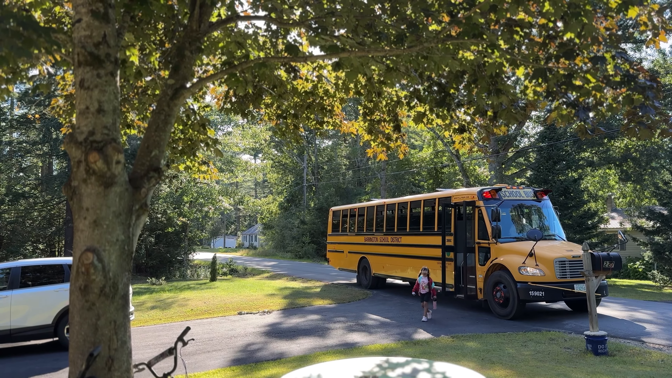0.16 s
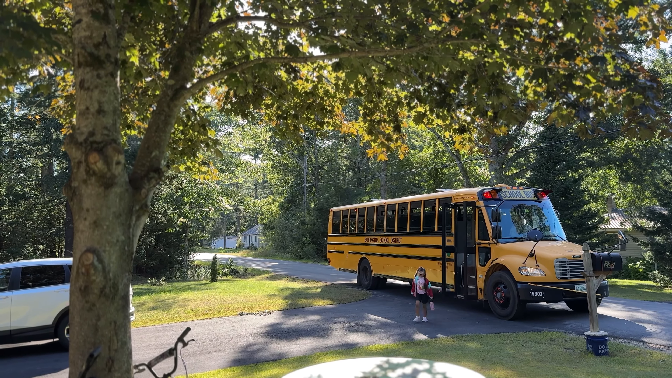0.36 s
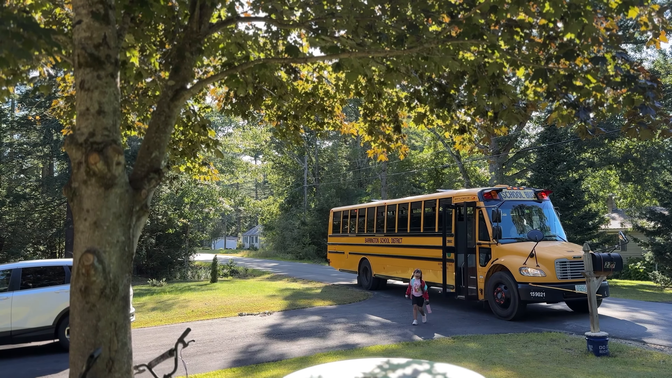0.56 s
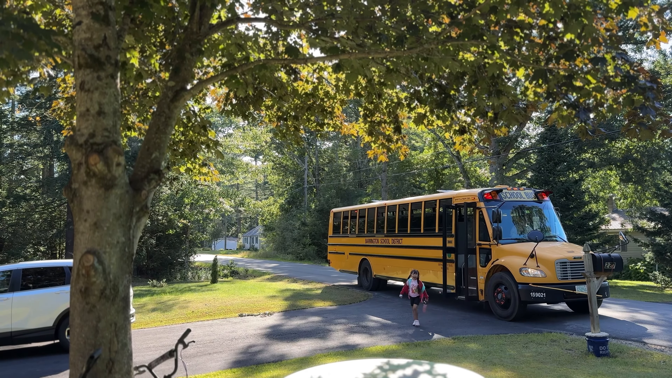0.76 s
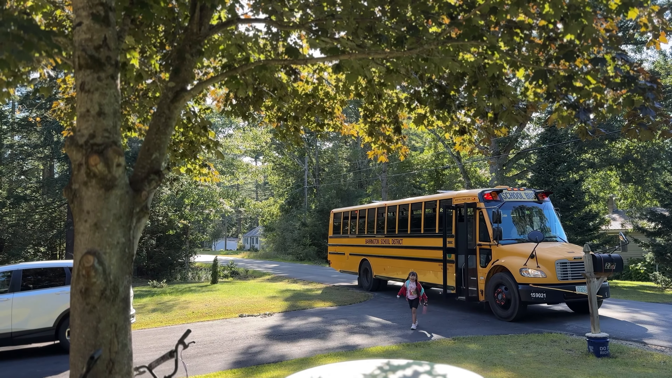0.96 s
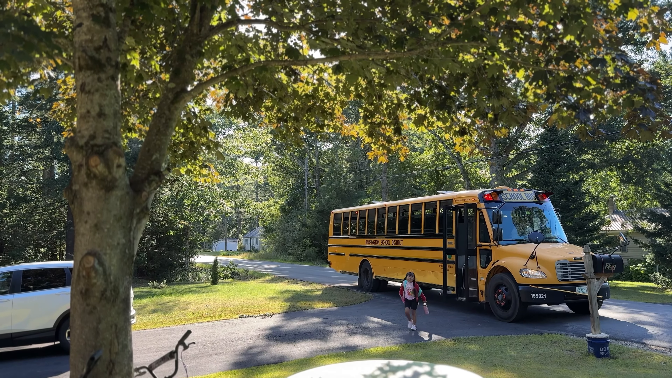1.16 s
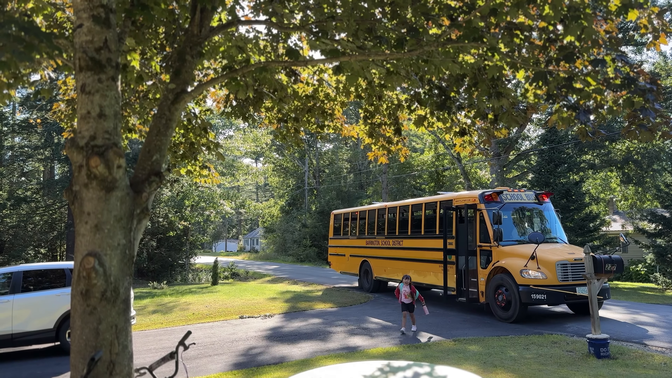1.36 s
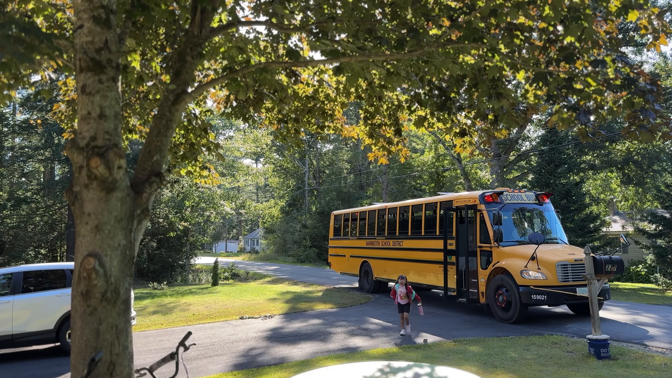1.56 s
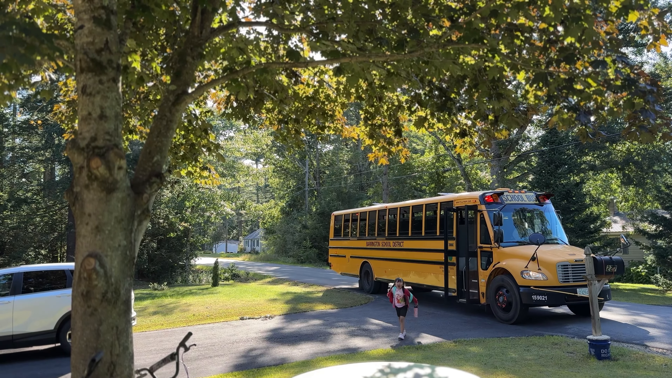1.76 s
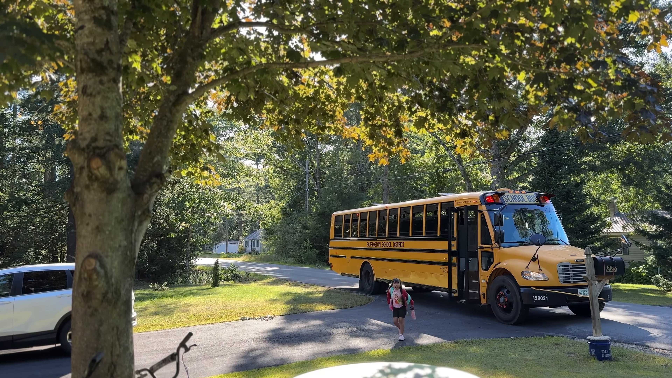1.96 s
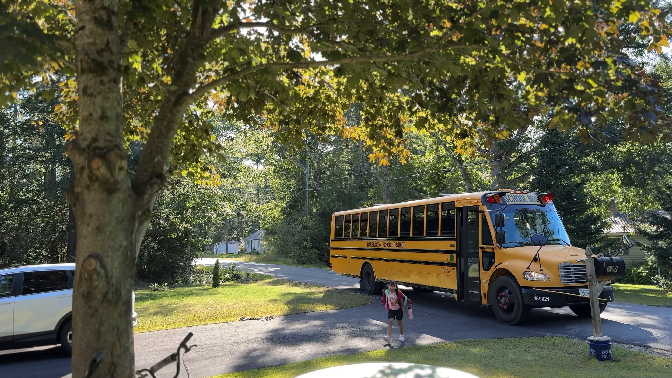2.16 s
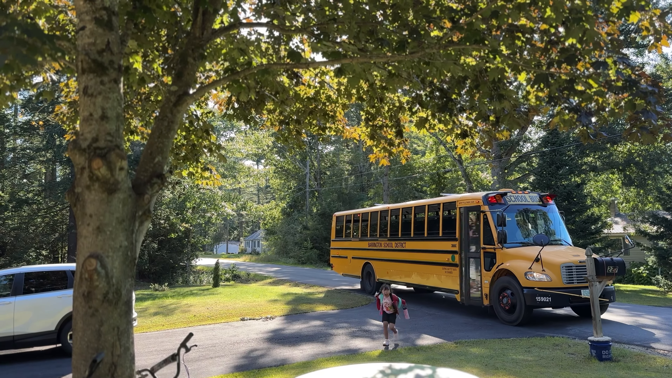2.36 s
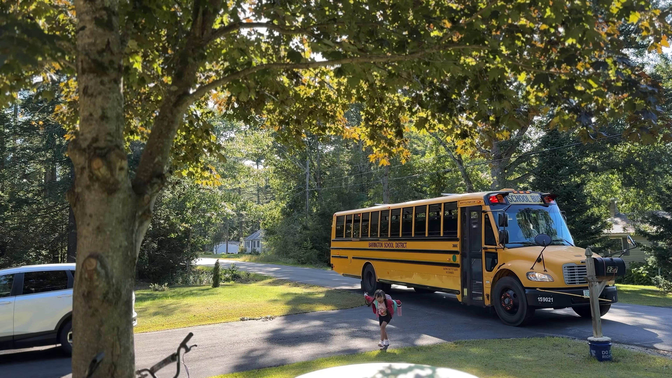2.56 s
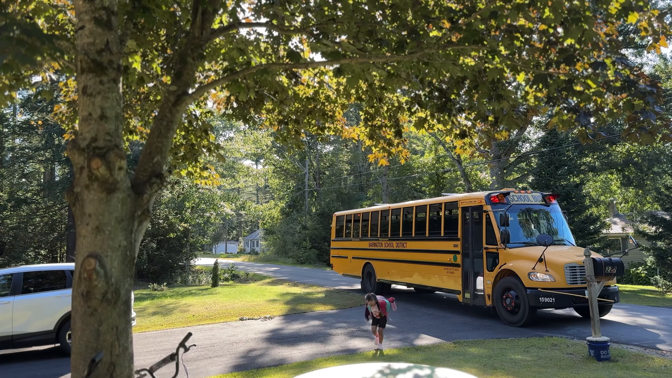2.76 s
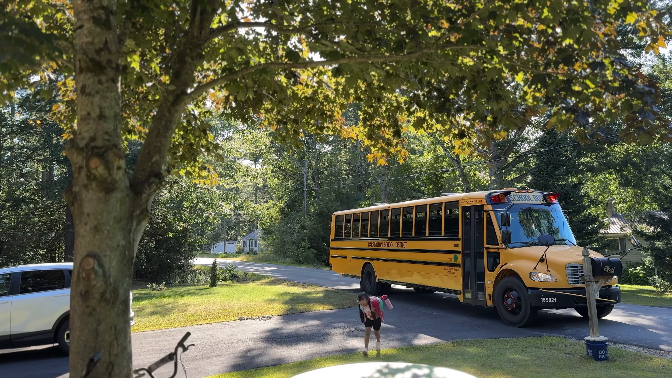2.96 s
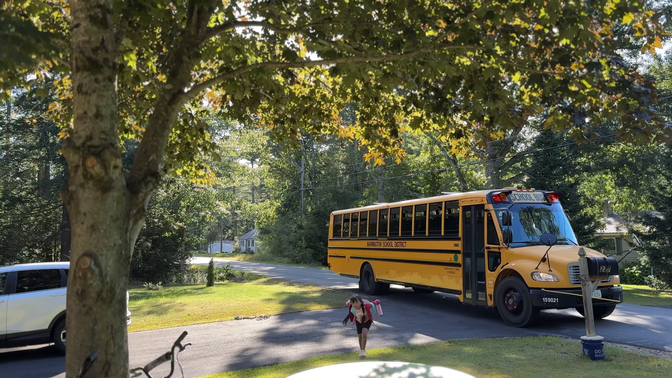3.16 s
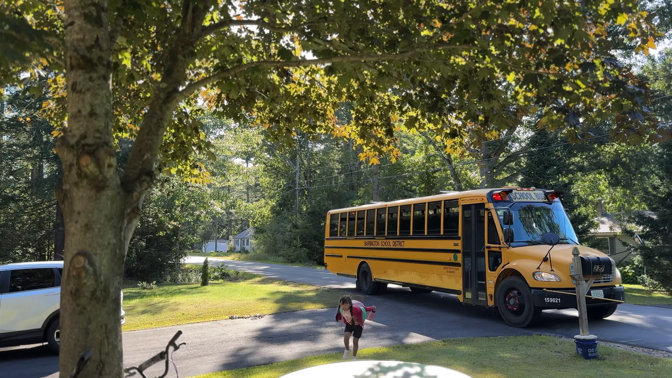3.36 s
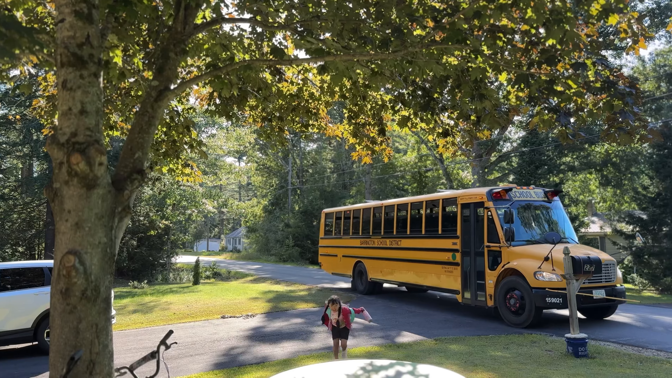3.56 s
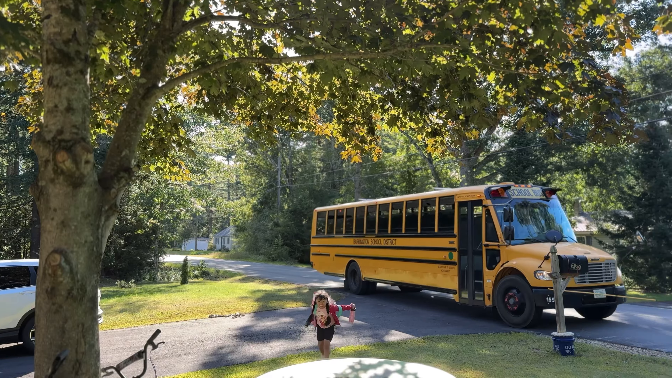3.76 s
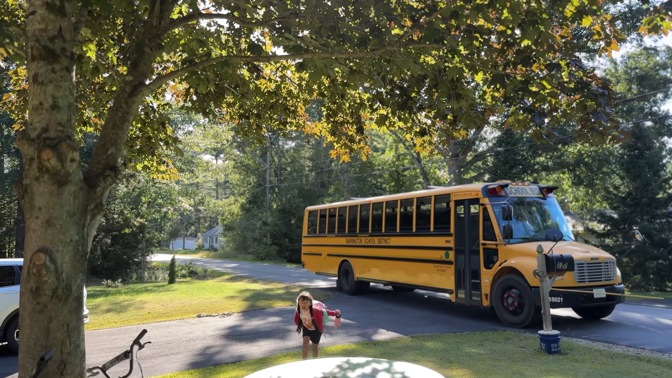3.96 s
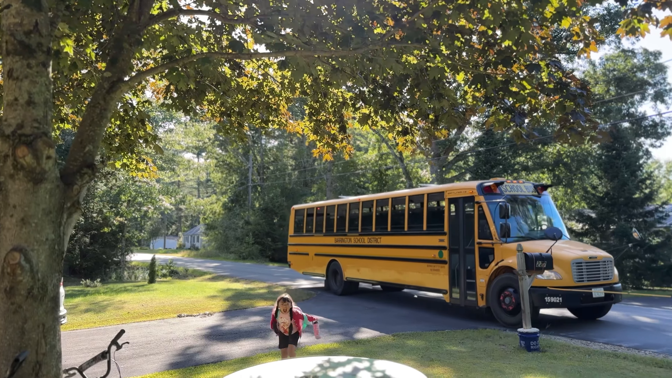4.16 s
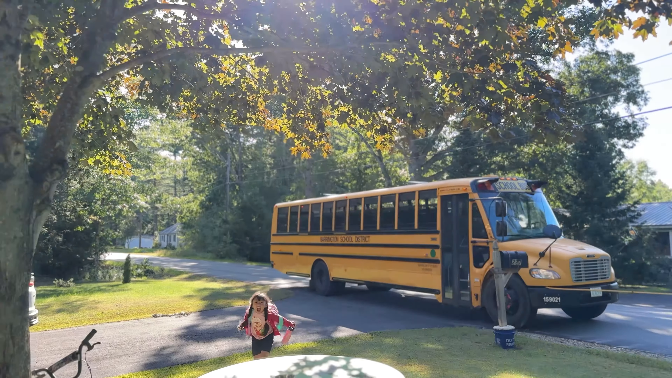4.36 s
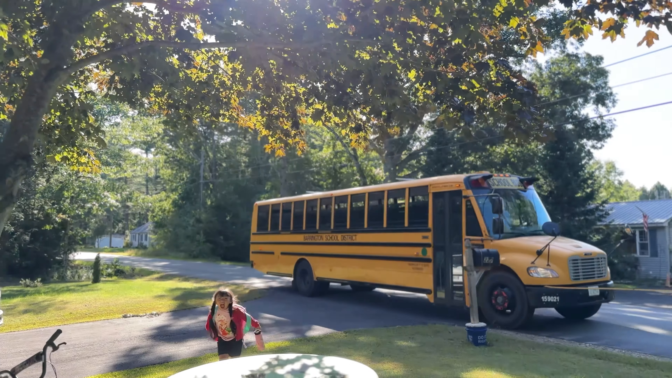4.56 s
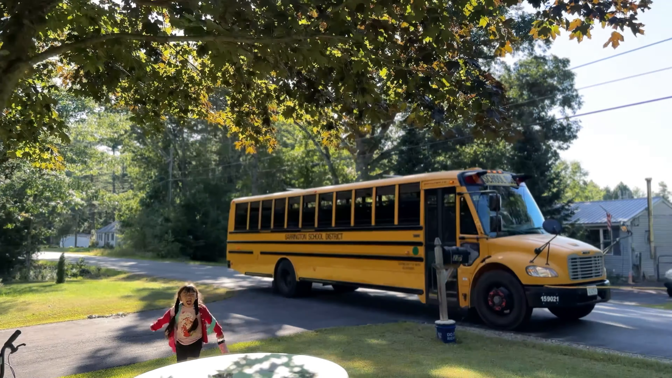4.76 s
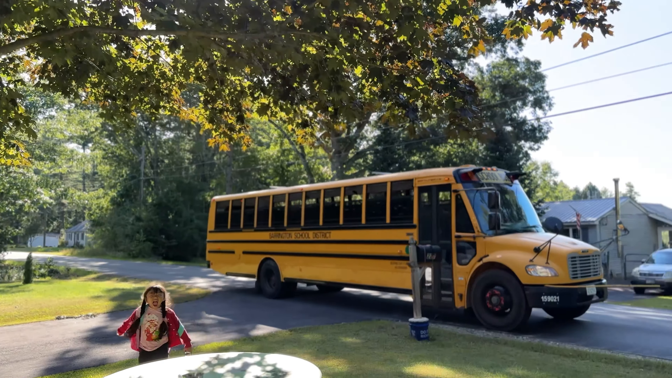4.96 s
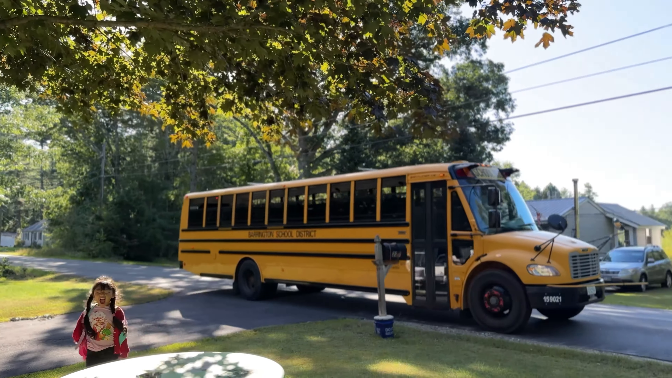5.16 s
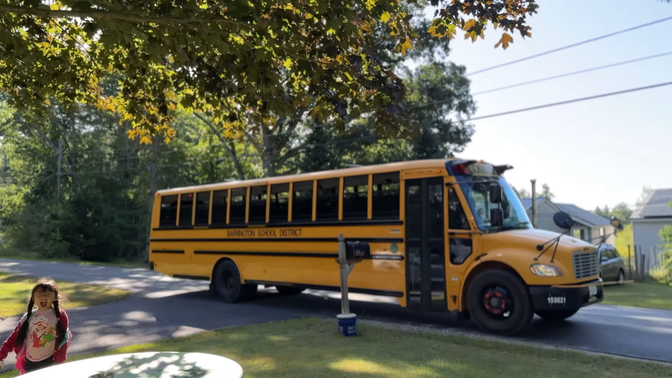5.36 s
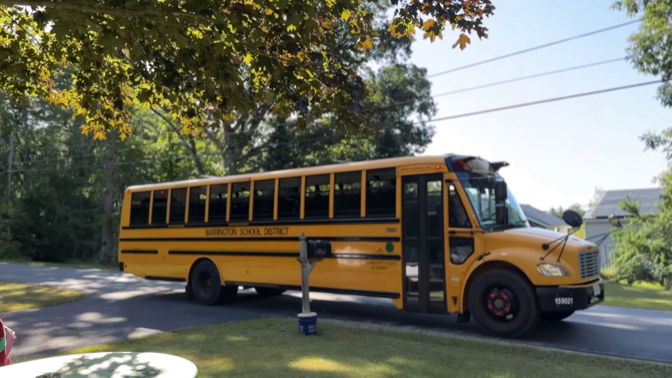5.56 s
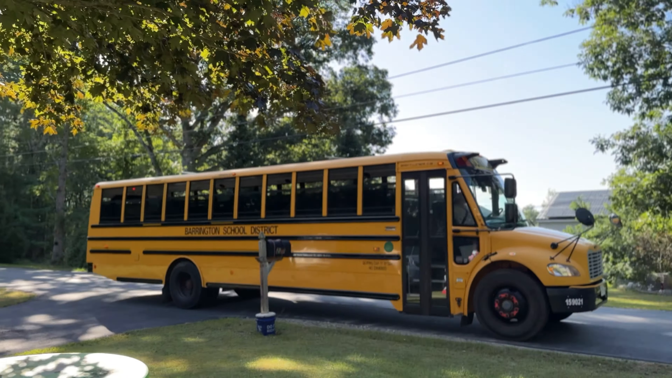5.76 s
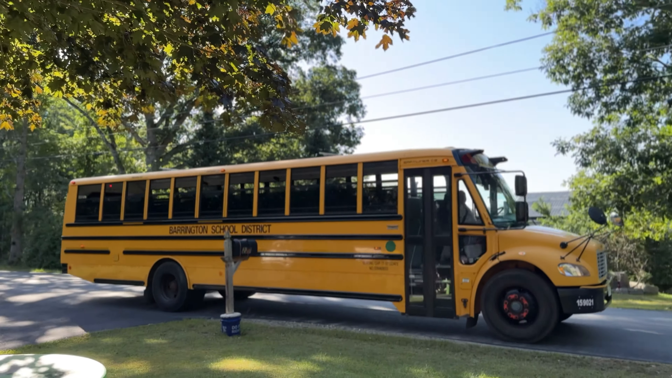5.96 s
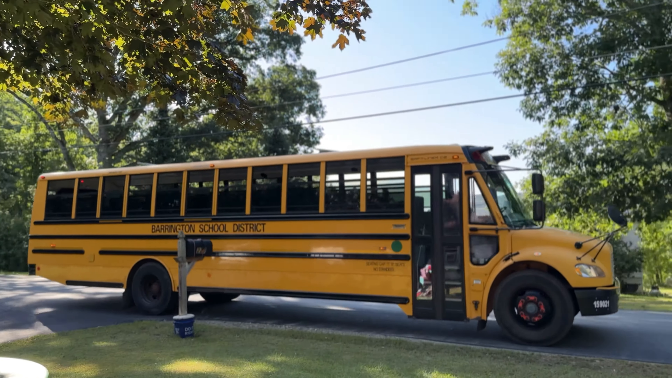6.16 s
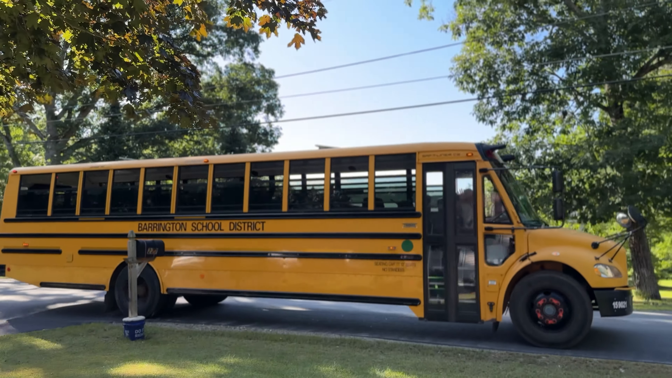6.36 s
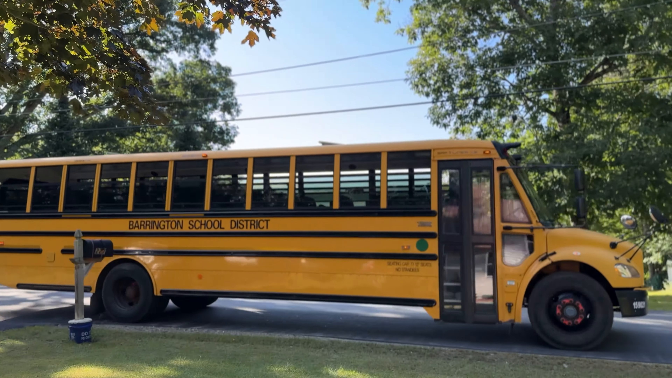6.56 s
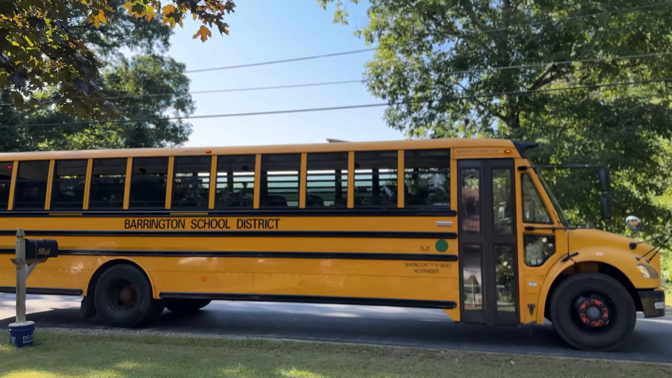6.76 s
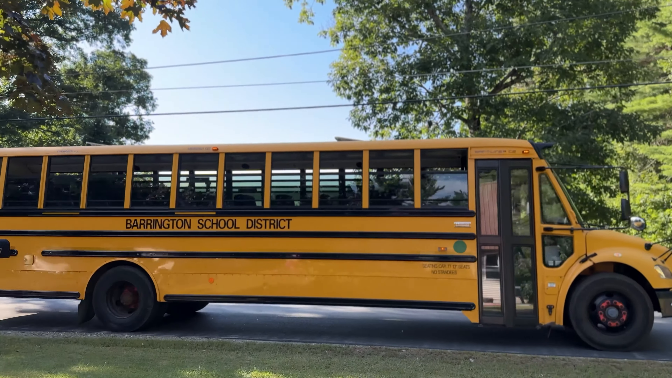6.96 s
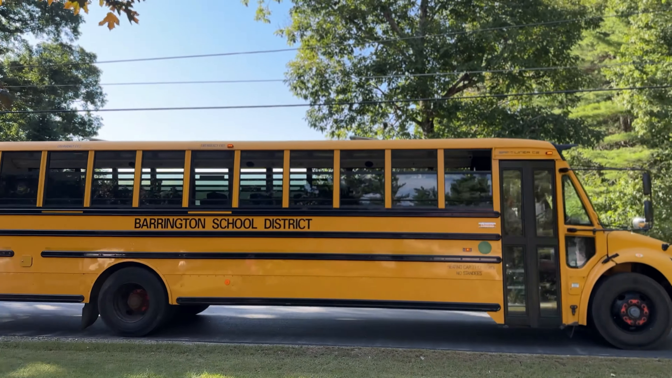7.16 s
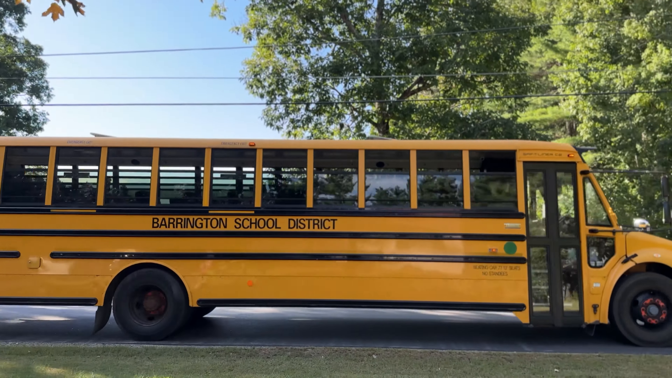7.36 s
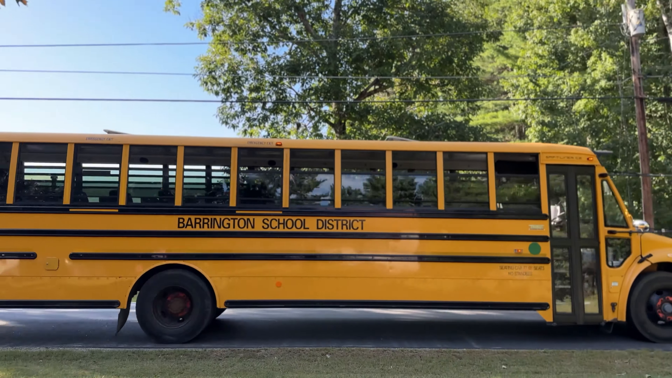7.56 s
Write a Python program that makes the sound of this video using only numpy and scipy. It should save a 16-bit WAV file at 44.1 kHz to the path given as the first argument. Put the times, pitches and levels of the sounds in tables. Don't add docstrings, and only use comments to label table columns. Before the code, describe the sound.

Outdoor stereo phone pickup from the far pavement of a leafy street. From 0 to 2.5 s a six-cylinder diesel bus idles at a low, steady throb, with soft injection and valve clatter and faint fan hiss. Tiny ticks fall near 0.1 and 1.8 s; a songbird at the left whistles short arched notes around 0.8-1.3 and 2.2-2.7 s. From 2.6 s the revs climb steeply, almost doubling in pitch by 3.3 s, with a small dull double knock at 3.1 s. The exhaust turns rough and growling, clearly louder, and gear whine sings around 3.5-4.5 s. Pitch rises slowly to a peak near 5.6 s, drops a little by 6 s, then holds and edges up. Level is strongest around 6 s. Thin, rasping, high spring squeaks come at 4.2, 5.4, 6.2, 7.0 and 7.4 s. The passing bus stays loud, clattering and hissing until the end at about 7.6 s.

```python
import sys
import numpy as np
from scipy import signal
from scipy.fft import rfft, irfft
from scipy.io import wavfile
from scipy.ndimage import uniform_filter1d

SR = 44100
rng = np.random.default_rng(int(sys.argv[2]) if len(sys.argv) > 2 else 0)


def boost(x):
    u = np.asarray(x, float) / 20
    return 10 ** u


def file_out(sig):
    cols = np.atleast_2d(sig).T
    lim = np.clip(cols, -1, 1)
    pcm = np.round(lim * 32767).astype(np.int16)
    wavfile.write(sys.argv[1], SR, pcm)


N = 335160
TIME = np.arange(N) / SR


def in_time(rows):
    s, *columns = np.transpose(rows)
    return [np.interp(TIME, s, column) for column in columns]


def rms_one(x):
    return x / np.sqrt(np.mean(x ** 2) + 1e-20)


def drift(rate):
    pole = np.exp(-80 * np.pi * rate / SR)
    noise = rng.standard_normal(N // 40 + 2002)
    slow = signal.lfilter([1], [1, -2 * pole, pole * pole], noise)[2000:]
    return np.interp(np.arange(N) / 40, np.arange(len(slow)), rms_one(slow))


def coloured(x, spectrum):
    hz, level_db = np.transpose(spectrum)
    log_hz = np.log(np.arange(N // 2 + 1) * SR / N + 1)
    gain = boost(np.interp(log_hz, np.log(hz), level_db, -150, -150))
    return rms_one(irfft(rfft(x) * gain, N))


def resonance(x, hz, width):
    r = np.exp(-np.pi * width / SR)
    top = np.array([1, 0, -1]) * (1 - r * r) / 2
    return signal.lfilter(top, [1, -2 * r * np.cos(2 * np.pi * hz / SR), r * r], x)


def sine(hz, lead=0):
    return np.sqrt(2) * np.sin(2 * np.pi * np.cumsum(hz) / SR + lead)


def bells(rows, which):
    return sum(height * np.exp(-((TIME - s) / half) ** 2)
               for s, name, half, height in rows if round(2 * name) == round(2 * which))


def level_law(law, rate, effort_db):
    idle_db, per_speed, per_effort = law
    return idle_db + per_speed * 20 * np.log10(rate / rate[0]) + per_effort * effort_db


def order(turns, k, load):
    k = np.round(2 * k) / 2
    if k % 1:
        lead = .8 + np.pi * (k > 5)
    else:
        lead = 1.75 * k - 2.55 + 1.8 * (k < 3) * (1 - load)
    echo_shift = 1.68 * load * drift(0.37)
    return np.sqrt(2) * np.cos(2 * np.pi * k * turns + lead + echo_shift)


# time in seconds, multiple of the firing rate, half length in seconds, level in dB.
ECHOES = [(1.8, 1, 0.059, 5), (2.4, 1, .1, 6), (2.3, 1, 0.1, -12), (4.5, 1, .12, 2), (5.09, 1, 0.26, 6.5),
          (5.7, 1, 0.094, -13), (6.3, 1, .2, -1), (7.03, 1, 0.44, 8), (4.03, 2, .2, 2.5),
          (4.65, 2, 0.23, -3), (6.1, 2, 0.6, -6.5), (6.24, 2, 0.46, 6.5), (7.1, 2, 0.3, -6),
          (2.4, 3.5, .12, -25), (3.37, 3.5, .3, -22), (4.5, 3.5, 0.097, 8.5), (5.17, 3.5, 0.23, 7.5),
          (10, 3.5, 0.14, -15), (7.1, 3.5, 0.21, -13), (7.55, 3.5, .15, 4), (3.96, 1.5, .25, 6.5),
          (6.3, 1.5, 0.61, 3.5), (2.85, 3, 0.1, 10), (4.06, 3, 0.19, 7.5), (6.83, 3, .4, 6.5),
          (3.6, 4, 0.5, -4), (4.06, 4, 0.34, 7), (7.6, 4, 0.6, 6.5), (4.6, 2.5, 0.17, -11),
          (6.76, 2.5, 0.32, 5.5)]
# frequency in Hz, level in dB.
TAILPIPE = [(37.5, -49), (52, -35), (62, -59), (76, -45.5), (81, -38.5), (104, -30.5), (123, -41),
            (148, -34)]


def strong_orders(turns, rate, load, effort_db):
    hz, db = np.transpose(TAILPIPE)
    tone = np.zeros(N)
    for k in (1, 2, 3.5):
        pipe_db = -48.5 if k % 1 else np.interp(np.log(k * rate), np.log(hz), db)
        level_db = pipe_db + 0.92 * effort_db + bells(ECHOES, k)
        tone += boost(level_db + 0.29 * load * drift(7.9)) * order(turns, k, load)
    return tone


# multiple of the firing rate, idle level in dB, loaded level in dB.
ORDER_DB = [(1.5, -39, -9.5), (2.5, -2, -11), (3, -7, -11), (4, 4, -12), (4.5, -5, -14.5), (5, -5.5, -23),
            (5.5, -3.5, -25), (6, -9.5, -19.5), (7, -18.5, -35), (8, -17, -24), (8.5, -7.5, -26.5)]


def growl(turns, rate, load):
    out = np.zeros(N)
    for k, idle_db, loaded_db in ORDER_DB:
        silencer_db = 9.0 * np.exp(-((k * rate - 165) / 35) ** 2)
        level_db = idle_db + load * (loaded_db - idle_db + silencer_db) + bells(ECHOES, k)
        out += boost(level_db + (0.5 + 2.17 * load) * drift(2.1)) * order(turns, k, load)
    return out


CYLINDER_DB = [1, 1, 0.32, 0.98, -0.28, -0.76]
# frequency in Hz, width in Hz, level in dB.
PIPE_RESONANCES = [(81, 70, -5), (157, 33, 6.5), (216.4, 50, 0.5), (300, 110, -7.5), (412, 160, -9)]


def throb(firings, load):
    count = np.floor(firings).astype(int)
    strength = boost(np.array(CYLINDER_DB))
    wander = np.choose(count % 6, [drift(1.0) for _ in range(6)])
    scatter = (.035 + 0.24 * load) * rng.standard_normal(N)
    uneven = (strength - strength.mean())[count % 6] + 0.37 * load * wander + scatter
    puffs = uneven * (np.diff(count, prepend=count[0]) > 0)
    out = np.zeros(N)
    for k, (hz, width, db) in enumerate(PIPE_RESONANCES):
        out += (-1) ** k * boost(db) * resonance(puffs, hz, width)
    return out / np.sqrt(uniform_filter1d(out ** 2, size=SR // 2) + 1e-12)


# frequency in Hz, level in dB per Hz.
RUMBLE = [(15, -55), (25, -30), (76, -6), (108, -1), (151, -5), (199, -8.5), (305, -4.5), (448, -12),
          (505, -43), (600, -62), (780, -48), (1320, -120)]
GROWL_LAW = (-42, 1.645, 0.18)


def exhaust(turns, firings, rate, load, effort_db):
    rumble = coloured(rng.standard_normal(N), RUMBLE)
    rumble = rumble * boost(-1.5 + 1.4 * load + 1.46 * drift(6.5))
    rough = growl(turns, rate, load) + boost(-0.4 - 2.6 * load) * throb(firings, load) + rumble
    return strong_orders(turns, rate, load, effort_db) + boost(level_law(GROWL_LAW, rate, effort_db)) * rough


def beat(firings, depth, sharp):
    late = firings - .15
    strength = boost(1.14 * np.array(CYLINDER_DB))[np.floor(late).astype(int) % 6]
    burst = strength * np.exp(-sharp * (late % 1))
    return rms_one(1 + depth * uniform_filter1d(burst, size=40))


def patchy(patchy_db, rate):
    edges, white = np.geomspace(250, 16000, 13), rng.standard_normal((2, N))
    out = np.zeros(N)
    for k, band in enumerate(zip(edges, edges[1:])):
        sos = signal.butter(2, band, "band", fs=SR, output="sos")
        out += boost(patchy_db * drift(rate)) * signal.sosfilt(sos, white[k % 2])
    return rms_one(out)


# frequency in Hz, level in dB per Hz.
CLATTER_MID = [
    [(280, 1.5), (480, -0.5), (622, -6.5), (647, -10), (744, -4), (1090, -2), (1280, -7.5), (1370, -7),
     (1640, -14), (1980, -2.5), (2160, -16), (2390, -7.5), (2980, -15.5), (4390, -12.5), (5200, -19),
     (6760, -28.5), (11400, -120)],
    [(260, -28), (450, 0), (564, -7.5), (1060, -2.5), (1210, -7.5), (1350, -20.5), (1590, -6.5),
     (1810, -10), (2130, -16.5), (2510, -10.5), (3020, -19), (3450, -12.5), (3980, -18), (4320, -13.5),
     (5200, -22), (6760, -38), (11400, -120)],
    [(260, -28), (450, -4.5), (692, -3.5), (840, 0), (1030, -8.5), (1190, -8), (1310, -10), (1770, -11),
     (2030, -5), (2320, -15.5), (2620, -6.5), (3020, -17.5), (3380, -11.5), (4240, -15), (5200, -20.5),
     (6760, -30), (11400, -120)],
]
# frequency in Hz, level in dB per Hz.
CLATTER_SIDE = [
    [(210, -53), (350, -29), (402, -21), (431, -14), (456, -10), (775, -9), (840, -3), (922, -14),
     (1220, 1), (1360, -2), (1480, -14), (1880, -6), (3890, -17), (4850, -17), (5500, -16), (7150, -49),
     (12100, -120)],
    [(210, -34), (350, -8), (411, -25), (568, -5), (667, 1), (880, -1), (1070, 3), (1330, -6), (1950, 0.5),
     (2210, -7), (2750, -4.5), (3130, -7), (3470, -7), (5500, -17), (7150, -42), (12100, -120)],
    [(180, -30), (300, -54), (437, -1), (788, 9), (1270, 5), (2070, 6.5), (2530, 5), (2900, -4), (3210, 9),
     (4550, -45), (6000, -19), (7800, -44), (13200, -120)],
]
SIDE_DB = [-3, -3.5, -4]
# frequency in Hz, share 0-1, lag in radians.
TIE = [(300, 0.77, 0.6), (700, 0.87, 2.2), (1370, 0.82, 1.58), (2480, 0.2, 4.1), (4100, 0.25, 0.93),
       (6030, 0.8, 0.73)]


def clatter(firings, stage, level_db, near, far):
    near, far = np.array([near, far]) * beat(firings, depth=0.28, sharp=2.7)
    hz, share, lag = np.transpose(TIE)
    bins = np.arange(N // 2 + 1) * SR / N
    share = np.interp(bins, hz, share).clip(0, 1)
    turn = np.exp(-1j * np.interp(bins, hz, lag))
    tied = irfft(share * turn * rfft(near) + np.sqrt(1 - share ** 2) * rfft(far), N)
    out = np.zeros((2, N))
    for k in range(3):
        part = np.sqrt(np.clip(1 - abs(stage - k), 0, 1))
        out[0] += part * coloured(near, CLATTER_MID[k])
        out[1] += part * boost(SIDE_DB[k]) * coloured(tied, CLATTER_SIDE[k])
    return boost(level_db) * out


# frequency in Hz, level in dB per Hz.
HISS_MID = [(2940, -8.5), (5000, -1), (5290, -5), (6110, -1.5), (8320, 0), (8900, -6.5), (9690, -17),
            (10500, -6.5), (11100, -9), (11900, -12), (12600, -28), (13100, -12), (13900, -7.5),
            (14800, -13.5), (15600, -29)]
# frequency in Hz, level in dB per Hz.
HISS_SIDE = [(2940, -18), (5000, 0), (5190, -11), (6200, -8), (6890, -11), (7990, -12), (9850, -18),
             (10600, -11), (11300, -36), (11700, -22), (12500, -19), (13300, -18), (14200, -29),
             (15100, -21), (15700, -23)]


def hiss(firings, level_db, near, far):
    near, far = np.array([near, far]) * beat(firings, depth=0.32, sharp=2.4)
    side = boost(3.0) * coloured(far - 0.083 * near, HISS_SIDE)
    return boost(level_db) * np.array([coloured(near, HISS_MID), side])


# time in seconds, teeth per firing, half length in seconds, level in dB.
WHINE = [(3.55, 15, .2, -42.5), (4.2, 15, .22, -42), (4.5, 15, .1, -47), (5.1, 15, .15, -52),
         (5.85, 15, .12, -47), (6.45, 15, .15, -45), (7.3, 15, .2, -50), (3.68, 14, .08, -46),
         (5.8, 12, .12, -48), (5.2, 12, .15, -51)]


def whine(rate):
    rows = [(s, teeth, half, boost(db)) for s, teeth, half, db in WHINE]
    return sum(bells(rows, teeth) * boost(1.5 * drift(6)) * sine(teeth * rate) for teeth in (15, 14, 12))


# time in seconds, frequency in Hz, level in dB.
SHAFT = [(4.2, 46, -60), (4.5, 51.1, -41), (4.8, 58.9, -47), (5.1, 65.84, -32), (5.5, 79.1, -28),
         (5.9, 73, -43)]


def shaft():
    hz, db = in_time(SHAFT)
    return boost(db) * sine(hz)


# start in seconds, length in seconds, start Hz, end Hz, level in dB.
SQUEAKS = [(4.15, .25, 6900, 6920, -46.5), (5.37, .18, 6900, 6950, -45.5), (6.17, .19, 6910, 6860, -43),
           (6.71, .04, 6850, 6800, -51), (6.95, .17, 6800, 6870, -44.5), (7.365, .075, 6830, 6750, -42.5)]
# time in seconds, lead in radians.
SQUEAK_LAG = [(4.2, 1.9), (5.4, 1.6), (6.3, 2.4), (6.7, 1.5), (7.0, .4)]


def squeaks():
    level, hz, flutter, waver = np.zeros(N), np.zeros(N), drift(45), drift(26)
    for s, length, start_hz, end_hz, db in SQUEAKS:
        rasp = .85 - .1 * (s - 4)
        span = slice(round(s * SR), round((s + length) * SR))
        part = np.clip((TIME[span] - s) / length, 0, 1)
        level[span] = boost(db + 5.5 * rasp * flutter[span]) * np.sqrt(np.sin(np.pi * part).clip(0))
        hz[span] = start_hz + (end_hz - start_hz) * part + 40 * rasp * waver[span]
    lag, = in_time(SQUEAK_LAG)
    return level * sine(hz, lead=np.array([[0], [1]]) * lag)


# time in seconds, peak in dB, frequency in Hz, t60 in seconds.
KNOCKS = [(.088, -41, 4000, .025), (.088, -43, 7500, .025), (1.786, -47, 7000, .014),
          (1.786, -50, 11000, .014), (1.917, -52, 7000, .008), (3.127, -43, 8000, .025),
          (3.13, -36, 900, .03), (3.168, -34, 1100, .04)]


def knocks():
    out, noise = np.zeros(N), rng.standard_normal(N)
    for s, db, hz, t60 in KNOCKS:
        body = resonance(resonance(noise, hz, 0.37 * hz), hz, 0.37 * hz)
        decay = (TIME > s) * boost(-60 * (TIME - s).clip(0, 1) / t60)
        out += boost(db) * rms_one(body) * decay
    return out


# start in seconds, length in seconds, start Hz, top Hz, end Hz.
BIRD = [(.79, .04, 2400, 2750, 2900), (.985, .045, 1600, 1950, 2100), (1.045, .08, 2150, 2420, 2150),
        (1.165, .055, 2250, 2480, 2000), (1.27, .06, 2100, 2780, 2200), (2.245, .055, 2200, 2620, 2250),
        (2.435, .08, 2250, 2720, 2250), (2.635, .07, 2200, 2850, 2100), (5.555, .04, 3000, 2800, 2400)]


def bird():
    level, hz = np.zeros(N), np.zeros(N)
    for s, length, start_hz, top_hz, end_hz in BIRD:
        span = slice(round(s * SR), round((s + length) * SR))
        part = np.clip((TIME[span] - s) / length, 0, 1)
        arch = 4 * part * (1 - part)
        level[span] = boost(-55) * np.sqrt(arch)
        hz[span] = start_hz + (end_hz - start_hz) * part + (top_hz - (start_hz + end_hz) / 2) * arch
    return level * sine(hz)


# time in seconds, firings per second.
SPEED = [(0, 37.52), (2.45, 37.52), (2.6, 38.8), (2.7, 41.5), (2.9, 52), (3.1, 60.8), (3.2, 64),
         (3.3, 65.8), (3.5, 68.2), (3.8, 70.9), (4.2, 73.2), (5.6, 84), (6.0, 78.5), (6.2, 77.3),
         (6.6, 77.4), (7.2, 78.1), (7.6, 80.8)]
# time in seconds, level in dB over idle.
EFFORT = [(0, 0), (2.4, 0.5), (2.92, -1), (3.15, 5.5), (3.4, 7), (4.0, 8), (4.5, 10.5), (5.0, 8),
          (5.4, 10.5), (5.75, 11), (6.03, 12.5), (6.14, 9.5), (6.5, 10), (6.9, 10.5), (7.05, 9.5),
          (7.6, 9.5)]
# time in seconds, stage of the drive (0 idling, 1 pulling away, 2 passing).
STAGE = [
    (2.7, 0),
    (3.1, 1),
    (4.8, 1),
    (5.35, 2),
]
LOAD_RATES = [39, 54]
HISS_LAW = (-60.5, 1.314, 0.47)


def scene():
    rate, = in_time(SPEED)
    effort_db, = in_time(EFFORT)
    stage, = in_time(STAGE)
    load = np.interp(rate, LOAD_RATES, [0, 1])
    turns = np.cumsum(rate) / SR
    firings = turns - rate[0] * .173
    low = exhaust(turns, firings, rate, load, effort_db) + shaft()
    near, far = patchy(patchy_db=1.3, rate=24.0), rng.standard_normal(N)
    clatter_ms = clatter(firings, stage, -44 + effort_db, near, far)
    hiss_ms = hiss(firings, level_law(HISS_LAW, rate, effort_db), near[::-1], far[::-1])
    mid, side = clatter_ms + hiss_ms
    mid = mid + whine(rate) + knocks()
    bus = np.array([mid + side + np.roll(low, 5), mid - side + np.roll(low, -5)])
    return bus + squeaks() + bird() * [[1.5], [-.4]]


def low_pass(x):
    return signal.sosfilt(signal.butter(12, 15810, fs=SR, output="sos"), x)


def record(dry):
    return low_pass(dry)


dry = scene()
out = record(dry)
file_out(out)
```